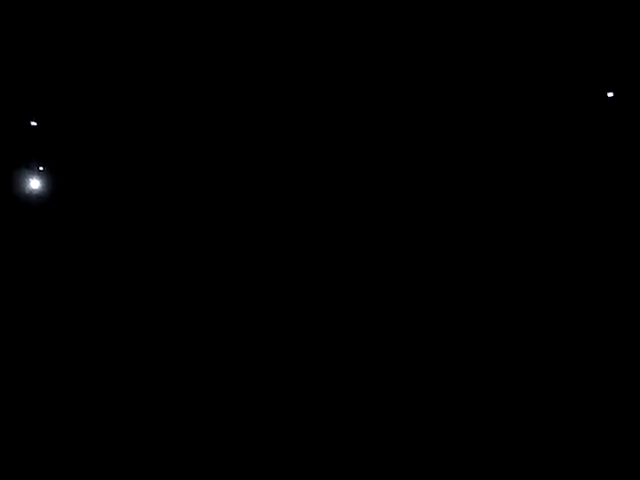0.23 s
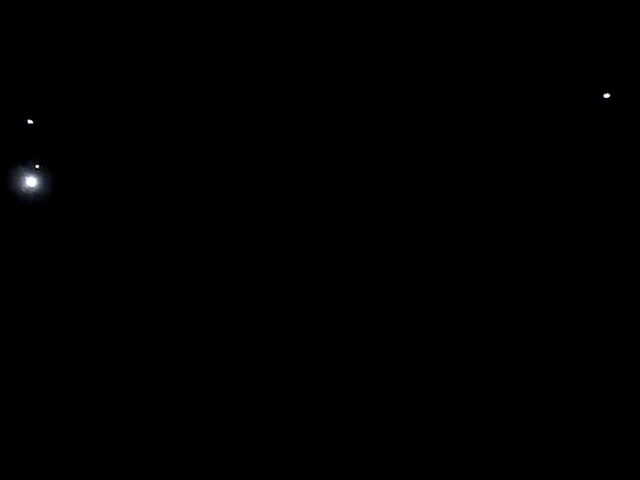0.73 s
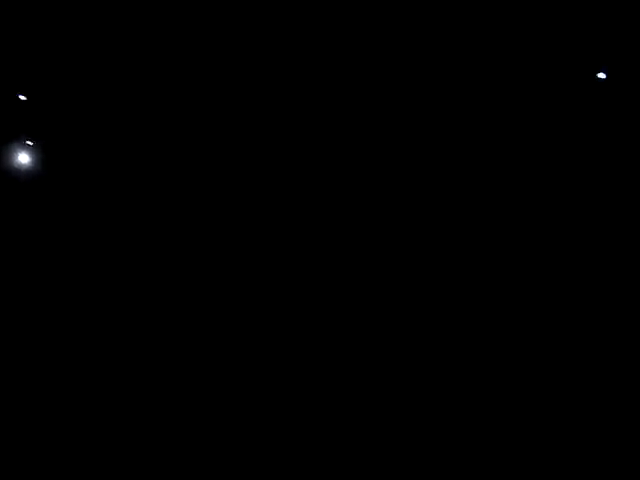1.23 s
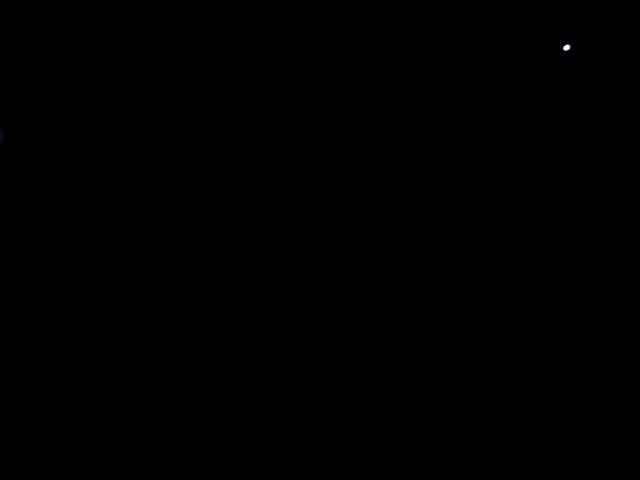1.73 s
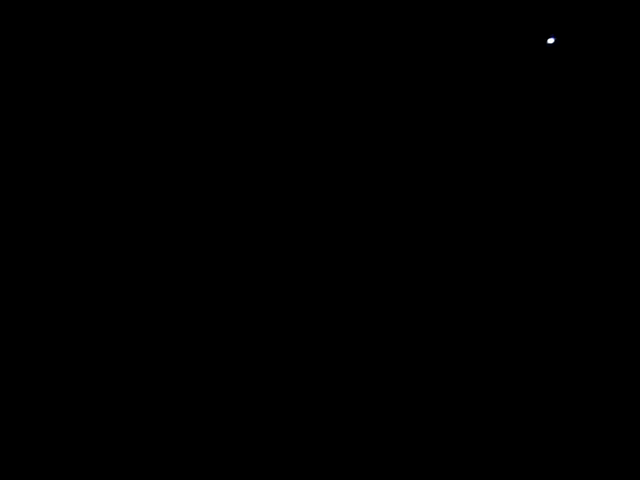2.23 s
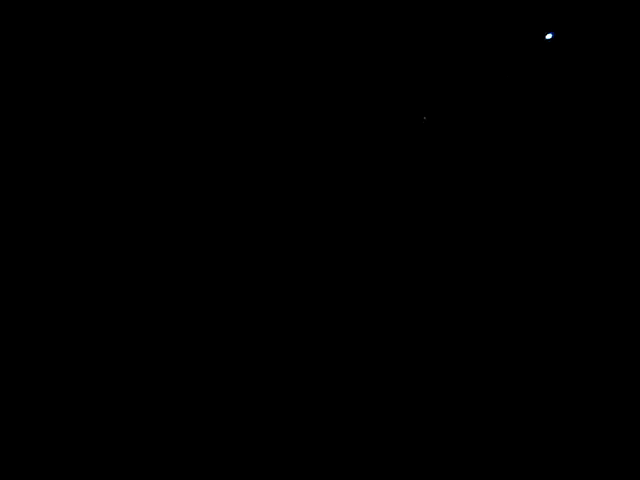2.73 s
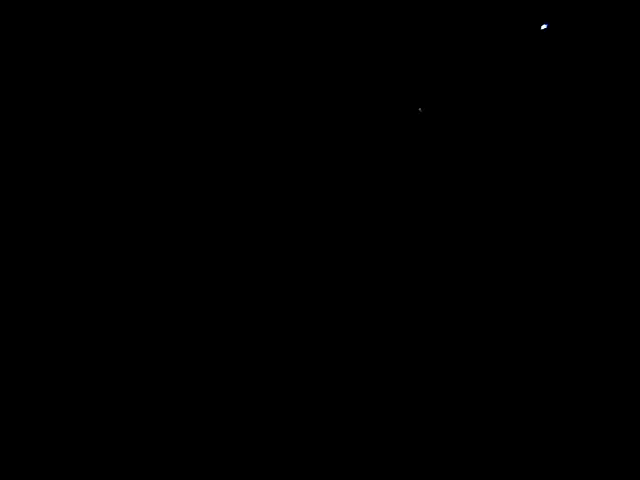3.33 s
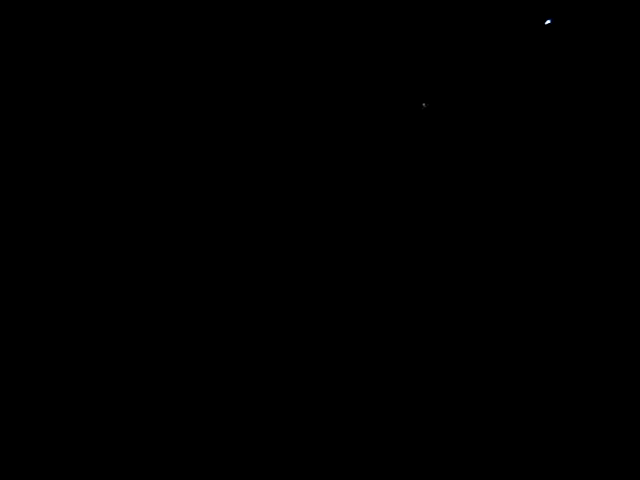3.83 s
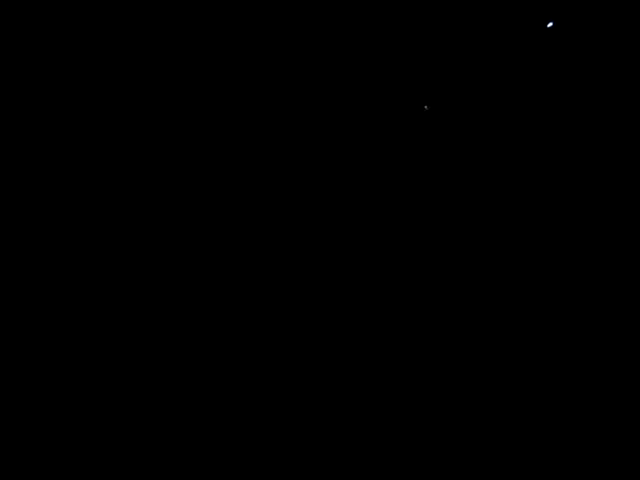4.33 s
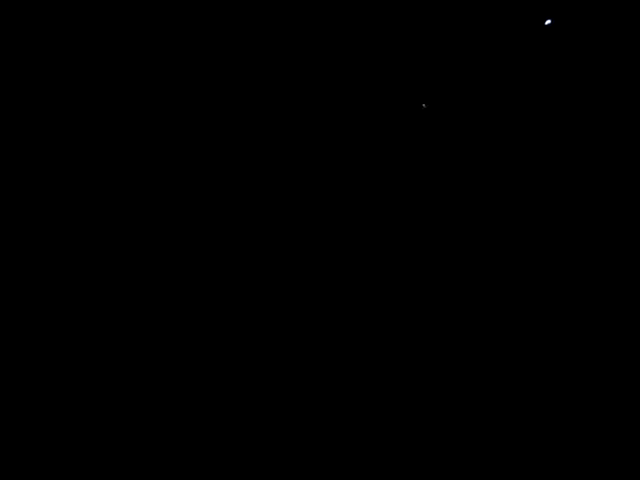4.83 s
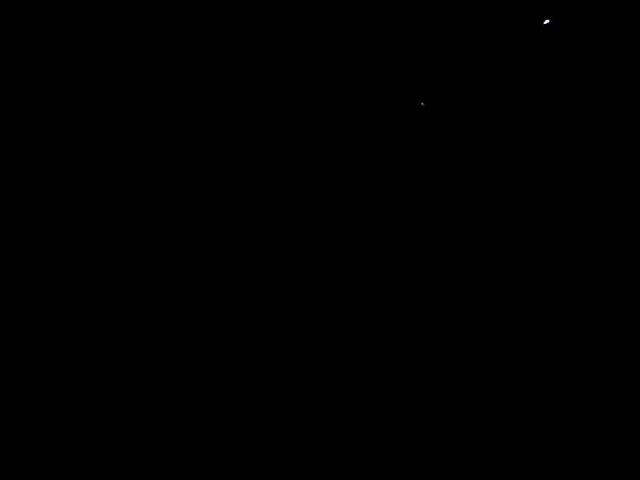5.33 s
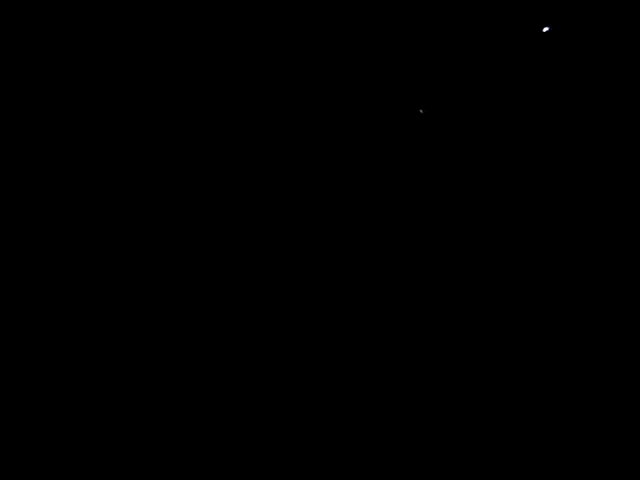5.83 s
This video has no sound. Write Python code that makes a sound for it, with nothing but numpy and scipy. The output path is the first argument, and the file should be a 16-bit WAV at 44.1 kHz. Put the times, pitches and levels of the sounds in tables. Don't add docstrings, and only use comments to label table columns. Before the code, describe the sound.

At night among trees, a nightingale gives five thin, high rising whistles, each stronger, then breaks into a loud, rapid burst of clear and raspy notes.

```python
import sys
import numpy as np
from scipy import signal
from scipy.io import wavfile
from scipy.ndimage import uniform_filter1d, minimum_filter1d

SR = 44100
rng = np.random.default_rng(int(sys.argv[2]) if len(sys.argv) > 2 else 0)


def amplitude_ratio(level_db):
    exponent = np.asarray(level_db, float) / 20
    return 10 ** exponent


def dump(signal):
    limited = np.clip(np.atleast_2d(signal).T, -1, 1)
    pcm = np.round(limited * 32767).astype(np.int16)
    wavfile.write(sys.argv[1], SR, pcm)


N = 268260

# (frequency [Hz], density [dB per Hz])
HUM_SPECTRUM = [(15, -60), (25, -20), (192, -3), (253, -4.5), (302, -3.5), (389, -3.5), (526, -2.5),
                (567, -5), (767, -4), (6200, -22.5), (7780, -20), (10300, -28.5), (13300, -70),
                (22000, -120)]
# (frequency [Hz], level [dB])
HUM_LINES = [(312, -66), (7575, -86.5)]
# (time [s], peak level [dB], ring frequency [Hz], treble over the ring [dB])
TICKS = [(0.2594, -39.5, 1500, 1), (0.441, -33.5, 1390, -3.5), (0.833, -43, 1350, -4),
         (0.94, -43, 1920, -13), (1.746, -38.5, 1510, -2), (1.8943, -42, 1560, -13),
         (1.9839, -45, 2170, -12), (2.8883, -37.5, 1440, -1), (3.032, -46, 1830, 1),
         (3.1492, -40.5, 1800, 3.5), (3.3173, -45, 1570, 0.5), (3.749, -44, 1550, 2)]
# (frequency [Hz], decay time t60 [s], level [dB])
GROVE_DECAY = [(1500, .4, -4), (2500, .65, -5), (3100, .65, -2), (4000, .6, -1), (5300, .6, 1),
               (8000, .55, 0)]
# (delay [ms], level [dB])
ECHOES = [(6.5, -12.5), (12, -3.5), (21, -15), (26, 1.5), (38, -3.5), (47, -6)]
# (time [s], pitch [Hz], level [dB])
WHISTLES = [
    [(1.41, 6480, -64), (1.515, 6700, -61.5), (1.54, 6830, -44), (1.58, 6860, -49), (1.64, 7400, -47.5),
     (1.69, 7400, -62)],
    [(2.12, 6086, -59), (2.19, 6300, -45.5), (2.28, 6620, -43.5), (2.33, 7050, -43), (2.395, 7170, -36.5),
     (2.425, 7540, -40.5), (2.46, 7490, -42), (2.5, 7450, -56)],
    [(2.72, 6090, -45), (2.775, 6300, -40.5), (2.83, 6330, -31.5), (2.9, 6485, -29.5), (2.96, 6800, -31.5),
     (3.02, 6750, -53)],
    [(3.18, 6180, -44), (3.285, 6240, -35), (3.36, 6400, -26.5), (3.45, 6370, -25), (3.56, 6270, -36)],
    [(3.76, 6150, -40.5), (3.87, 6230, -32.5), (4.03, 6500, -28), (4.1, 6470, -30), (4.15, 6400, -34)],
]
# (start [s], length [s], first pitch [Hz], held pitch [Hz], level [dB])
NOTES = [(1.072, .02, 2490, 2505, -56), (1.086, .1, 3700, 3710, -61), (2.682, .03, 5600, 5600, -57),
         (4.282, 0.017, 1785, 1465, -21.5), (4.3, 0.034, 1500, 1287, -35.5),
         (4.425, 0.034, 3092, 3113, -27.5), (4.46, 0.032, 3054, 2997, -25.5),
         (4.515, 0.12, 3060, 3075, -42.5), (4.458, 0.031, 2576, 2507, -14.5), (4.5, 0.027, 2458, 2483, -12),
         (4.532, 0.042, 2503, 2507, -14.5), (4.574, 0.04, 2496, 2477, -15.5),
         (4.727, 0.023, 4220, 4134, -37), (4.751, 0.036, 4057, 4100, -24.5),
         (4.844, 0.017, 1280, 1810, -29.5), (4.86, 0.017, 1817, 2143, -16), (4.876, 0.019, 2230, 1940, -19),
         (4.89, 0.015, 1886, 1490, -23.5), (4.885, 0.073, 2194, 2215, -28),
         (4.954, 0.0774, 2888, 2474, -15), (5.081, 0.0091, 1785, 1390, -26),
         (5.101, .011, 1798, 1420, -28.5), (5.123, 0.012, 1780, 1390, -27)]
# (start [s], length [s], pitch
# [Hz], level [dB], buzz depth [Hz])
BUZZES = [(1.615, 0.063, 7600, -51, 280), (2.415, 0.054, 7900, -61, 202), (1.851, 0.021, 2800, -52, 450),
          (1.882, 0.019, 2830, -60, 445), (2.948, 0.12, 6970, -51, 240), (3.19, .05, 5750, -62, 250),
          (3.524, .06, 5860, -52, 247), (3.766, 0.068, 5720, -55, 252), (3.975, 0.077, 6830, -48, 171),
          (4.459, 0.14, 2035, -48.5, 150), (4.776, 0.0078, 6400, -42.5, 500), (4.78, 0.056, 5500, -29, 750),
          (5.239, 0.056, 5040, -31.5, 990), (5.25, 0.054, 2815, -35.5, 350),
          (5.345, 0.067, 5270, -32.5, 890)]
# (start [s], length [s], level [dB], level change at the foot [dB])
SWEEPS = [
    (5.201, .055, -23, 2.5),
    (5.315, .05, -20.5, -17),
]
# (share of length [0..1], pitch [Hz], level [dB], buzz depth [Hz])
SWEEP_COURSE = [(0, 4913, -6, 305), (.17, 5600, -4, 576), (0.418, 5380, -1.5, 554),
                (0.599, 4450, -2.3, 540), (0.741, 3350, -2.5, 482), (.88, 2554, -3.5, 200),
                (1, 2630, -2, 100)]
# (time [s], pitch [Hz], level [dB])
CHUCK = [
    (4.255, 975, -43.5),
    (4.261, 965, -39),
    (4.269, 951, -32),
    (4.278, 942, -35),
    (4.29, 880, -42.5),
]
# (multiple of the pitch [1], level [dB])
CHUCK_PARTIALS = [(2, -8), (3, 0), (4, -6), (5, -17), (6, -24), (7, -28), (8, -30), (10, -32)]
OVERTONES_DB = [-41, -53]
# (time [s], length [ms])
GAPS = [(1.519, 6.7), (1.533, 7.3), (1.604, 5.8), (2.164, 6.7), (2.286, 6.2), (2.707, 16), (2.7646, 7.4),
        (2.7764, 6.9), (2.8112, 5.4), (2.824, 7.3), (2.8704, 5.7), (2.9199, 6), (2.9734, 5.5), (3.163, 9.2),
        (3.263, 7.1), (3.2814, 16), (3.312, 8.7), (3.381, 15), (3.409, 9.2), (3.4487, 8.5), (3.5069, 15.0),
        (3.5525, 7.5), (3.6554, 17), (3.7425, 9.3), (4.024, 7.5), (4.0767, 7.5), (4.1346, 11.8)]
STUTTER_MS = (3.4, 6.1)
# (frequency [Hz], level [dB])
ROUNDING = [(1500, -24), (3000, -16), (4500, -10.5), (6200, -10.5), (8000, -22)]


def evened(x):
    return x / np.sqrt(np.mean(x ** 2) + 1e-20)


def read(points, hz, axis=1):
    table = np.transpose(points)
    return np.interp(np.log(hz + 1), np.log(table[0] + 1), table[axis])


def add(mix, s, sound):
    part = mix[round(s * SR):][:len(sound)]
    part += sound[:len(part)]


def band(x, lo_hz, hi_hz):
    return signal.sosfilt(signal.butter(2, [lo_hz, hi_hz], "band", fs=SR, output="sos"), x)


def hum(level_db=-53, patchy_db=0.2):
    frames, hz = N // 256 + 5, np.fft.rfftfreq(1024, 1 / SR)
    real, imaginary, patches = rng.standard_normal((frames, 513, 3)).T
    patches = uniform_filter1d(patches, 10, 0)
    patches = evened(uniform_filter1d(patches, 10, 1))
    spectrum_db = read(HUM_SPECTRUM, hz)[:, None] + patchy_db * patches
    z = (real + 1j * imaginary) * amplitude_ratio(spectrum_db)
    noise = signal.istft(z, nperseg=1024, noverlap=768)[1][:N]
    out = amplitude_ratio(level_db) * evened(noise)
    for line_hz, db in HUM_LINES:
        out += amplitude_ratio(db) * evened(band(rng.standard_normal(N), line_hz - 20, line_hz + 20))
    return out


def ticks():
    out, t = np.zeros(N), np.arange(600) / SR
    for s, db, hz, treble_db in TICKS:
        noise = rng.standard_normal(len(t))
        knock = np.sin(2 * np.pi * hz * t) + 0.73 * evened(band(noise, 1400, 3530))
        crack = amplitude_ratio(treble_db - 7) * evened(band(noise, 3500, 8000))
        decay = amplitude_ratio(db - 60 * t / 0.013)
        add(out, s, decay * (knock + crack))
    return out


def grove(x, tail_db=-6.5):
    taps = np.zeros(SR)
    at = np.arange(300, SR - 20, 20) + rng.integers(0, 20, (SR - 301) // 20)
    taps[at] = rng.choice([-1., 1.], len(at))
    hz, t, z = signal.stft(taps, SR, nperseg=256)
    level_db = read(GROVE_DECAY, hz, axis=2)[:, None]
    t60 = read(GROVE_DECAY, hz)[:, None]
    tail = signal.istft(z * amplitude_ratio(level_db - 60 * t / t60), SR, nperseg=256)[1]
    tail *= amplitude_ratio(tail_db) / np.linalg.norm(tail)
    for ms, db in ECHOES:
        tail[round(ms * SR / 1000)] += amplitude_ratio(db - 12)
    return signal.fftconvolve(x, tail)[:N]


def played(rows):
    s, *columns = np.transpose(rows)
    t = np.arange(s[0], s[-1], 1 / SR)
    return t, [np.interp(t, s, c) for c in columns]


def held(start, length, first_hz, held_hz, db, depth=0):
    attack_s, release_s, glide_s = 0.012, 0.016, 0.0165
    edge_db, droop_db_per_s = -17.5, -39.5
    s = np.linspace(0, length, round(length * 1000) + 1)
    rise, fall = min(attack_s, length / 2), min(release_s, length / 2)
    edge = np.maximum(np.maximum(1 - s / rise, 1 - (length - s) / fall), 0) ** 2
    hz = first_hz + (held_hz - first_hz) * np.minimum(s / min(glide_s, length), 1)
    return np.c_[start + s, hz, db + edge_db * edge + droop_db_per_s * s, depth + 0 * s]


def sweep(start, length, db, fade_db):
    share, hz, shape_db, depth = np.transpose(SWEEP_COURSE)
    return np.c_[start + length * share, hz, db + shape_db + fade_db * share ** 3, depth]


def voice(t, hz, db, partials):
    angle = 2 * np.pi * np.cumsum(hz) / SR
    tone = sum(amplitude_ratio(p_db) * np.sin(k * angle) for k, p_db in partials)
    breath = uniform_filter1d(amplitude_ratio(db), size=260, mode="nearest")
    ends = signal.windows.tukey(len(t), min(1, .007 / (t[-1] - t[0])))
    return np.sqrt(2) * breath * tone * ends


def whistle(rows, waver_hz=40):
    t, (hz, db) = played(rows)
    waver = evened(uniform_filter1d(rng.standard_normal(len(t)), 300))
    return t[0], voice(t, hz + waver_hz * waver, db, [(0.99, 0.0085)])


def note(rows, buzz_hz=330, jitter=0.76, rasp_db=-26, waver_hz=25, throb=0.62):
    t, (hz, db, depth) = played(rows)
    noise, drift = rng.standard_normal((2, len(t)))
    speed = buzz_hz * (1 + jitter * evened(uniform_filter1d(drift, 80)))
    angle = 2 * np.pi * np.cumsum(speed) / SR
    waver = waver_hz * evened(uniform_filter1d(drift, 200))
    partials = [(1, 0), *zip((2, 3), OVERTONES_DB)]
    tone = voice(t, hz + waver + depth * np.sin(angle), db, partials)
    rasp = amplitude_ratio(db + rasp_db) * evened(band(noise, 7700, 11000))
    buzz = np.clip(depth / 500, 0, 1)
    return t[0], tone * (1 + throb * buzz * np.cos(angle)) + buzz * rasp


def bird():
    song = np.zeros(N)
    for row in WHISTLES:
        add(song, *whistle(row))
    for row in NOTES:
        add(song, *note(held(*row)))
    for start, length, hz, db, depth in BUZZES:
        add(song, *note(held(start, length, hz, hz, db, depth)))
    for row in SWEEPS:
        add(song, *note(sweep(*row)))
    t, (hz, db) = played(CHUCK)
    add(song, t[0], voice(t, hz, db, CHUCK_PARTIALS))
    return song


def scene():
    song = bird()
    return (song + grove(song) + hum() + ticks())[None]


def bands(hz):
    return (np.arange(len(hz)) // 4 == np.arange(len(hz) // 4 + 1)[:, None]) * 1.


def rounding(x):
    hz, _, z = signal.stft(x, SR, nperseg=512, noverlap=384)
    noise = signal.stft(rng.standard_normal(N), SR, nperseg=512, noverlap=384)[2]
    band_power = bands(hz).T @ bands(hz) @ abs(z) ** 2
    step = np.sqrt(band_power) * amplitude_ratio(read(ROUNDING, hz))[:, None]
    return signal.istft(step * noise / abs(noise).mean(), SR, nperseg=512, noverlap=384)[1][:N]


def stutters(count=36):
    place, size = rng.random((count, 2)).T
    first, last = WHISTLES[0][0][0], CHUCK[0][0]
    shortest, longest = STUTTER_MS
    return list(zip(first + (last - first) * place, shortest + (longest - shortest) * size))


def coarse_bands(x, gap_db=-30, flatten=0.42):
    margin_db, up_db, down_db = -40, -5.5, -25
    from_hz, whistle_hz = 3800, (5500, 8000)
    hz, t, z = signal.stft(x + rounding(x), SR, nperseg=256, noverlap=192)
    member = bands(hz)
    power = member @ abs(z) ** 2
    centre = member @ hz / member.sum(1)
    high = centre[:, None] > whistle_hz[0]
    slow = uniform_filter1d(power, size=25)
    gain = ((slow + 1e-8) / (power + 1e-8)) ** (flatten / 2)
    for s, ms in [*GAPS, *stutters()]:
        gain[:, (t > s) & (t < s + ms / 1000)] = amplitude_ratio(gap_db)
    whistling = high & (centre[:, None] < whistle_hz[1]) & (t < CHUCK[0][0])
    gain = np.where(whistling & (slow > amplitude_ratio(-128)), gain, 1)
    khz = (centre[:, None] - centre) / 1000
    slope_db = np.where(khz > 0, up_db * khz, -down_db * khz)
    spread = amplitude_ratio(2 * slope_db) * (centre > from_hz)
    mask = -minimum_filter1d(-(spread @ power), size=13, origin=-5) * amplitude_ratio(2 * margin_db)
    mask = np.maximum(mask, .42 * slow * high * (slow < amplitude_ratio(-132)))
    steady = uniform_filter1d(power, size=9)
    gain *= steady ** 6 / (steady ** 6 + mask ** 6 + 1e-99)
    return signal.istft(z * (member.T @ gain), SR, nperseg=256, noverlap=192)[1][:N]


def top_cut(x):
    return signal.sosfilt(signal.butter(12, 10410, fs=SR, output="sos"), x)


def record(dry):
    x = coarse_bands(dry[0])
    low_pass = signal.firwin(1023, 10230, window=("kaiser", 9), fs=SR)
    mix = signal.oaconvolve(x, low_pass, "same")[None]
    return top_cut(mix)


dry = scene()
out = record(dry)
dump(out)
```